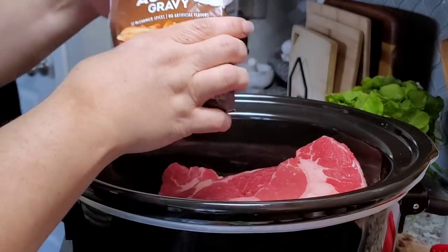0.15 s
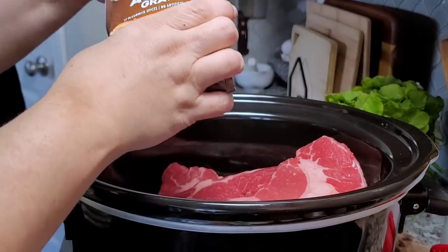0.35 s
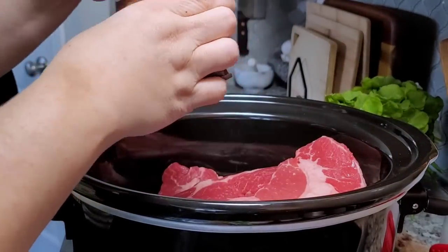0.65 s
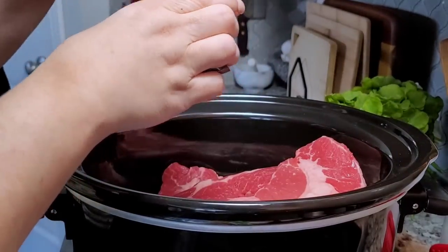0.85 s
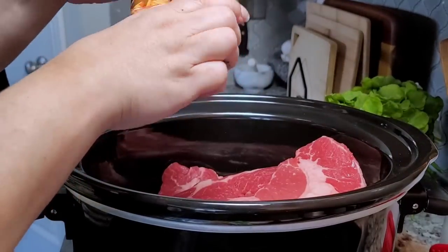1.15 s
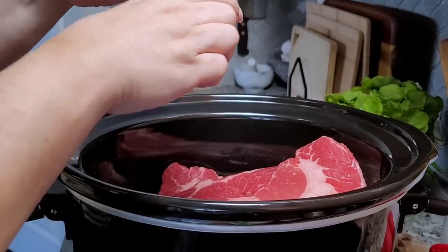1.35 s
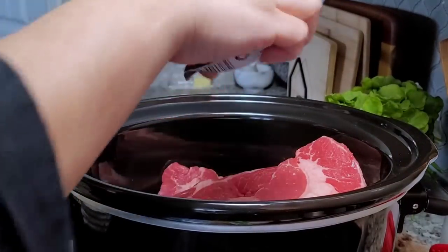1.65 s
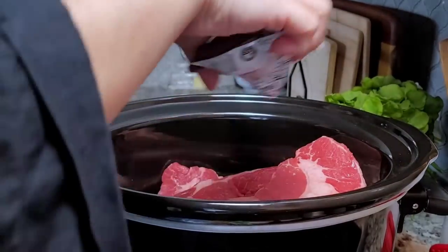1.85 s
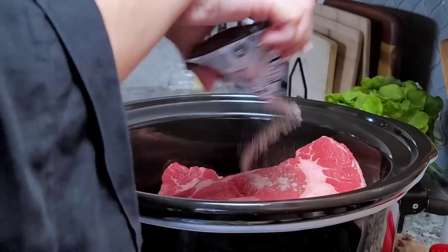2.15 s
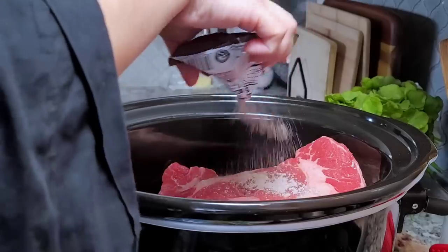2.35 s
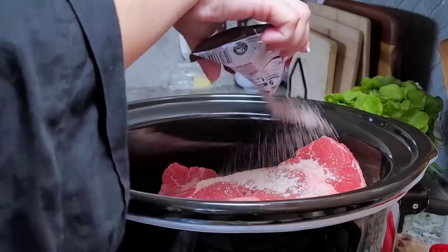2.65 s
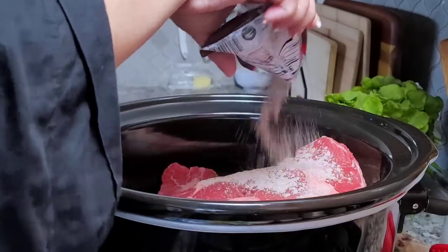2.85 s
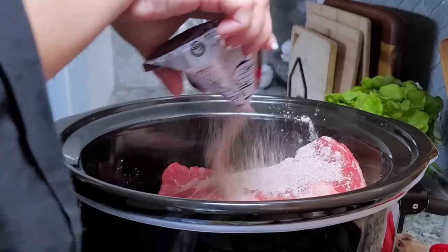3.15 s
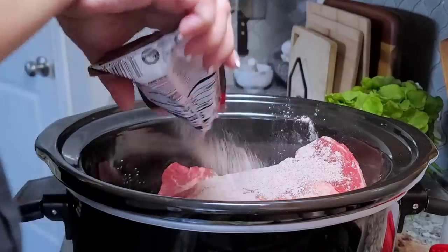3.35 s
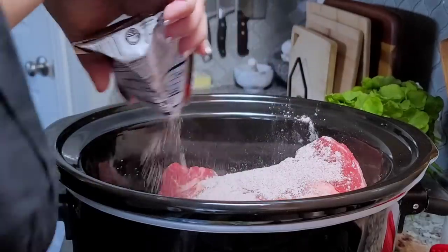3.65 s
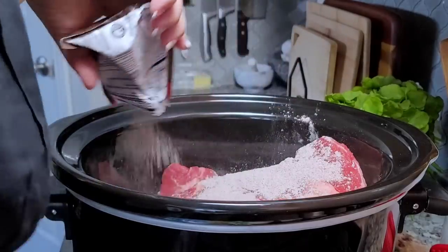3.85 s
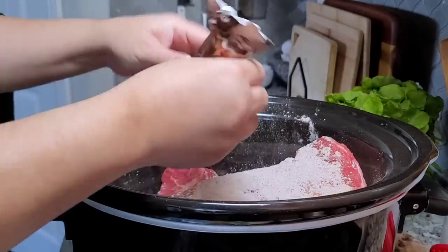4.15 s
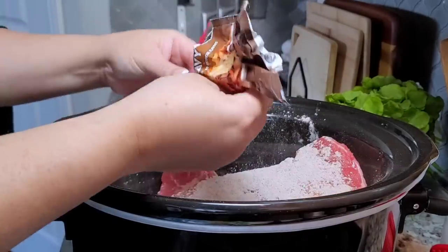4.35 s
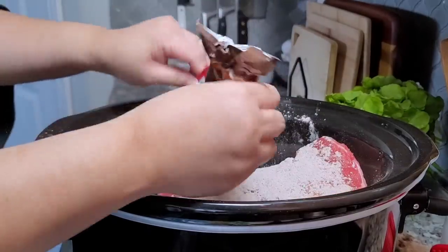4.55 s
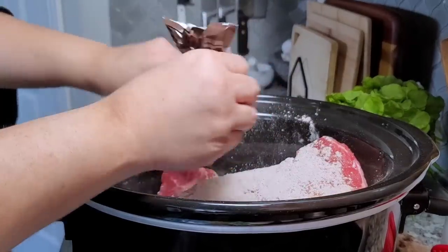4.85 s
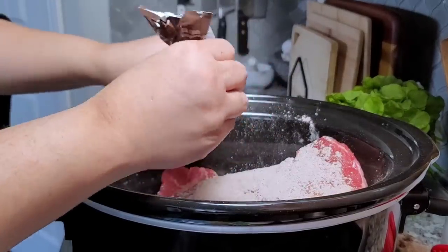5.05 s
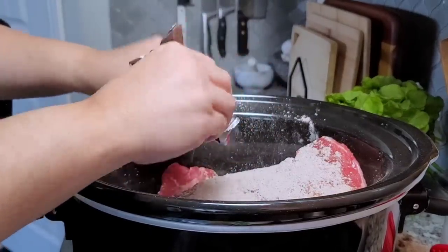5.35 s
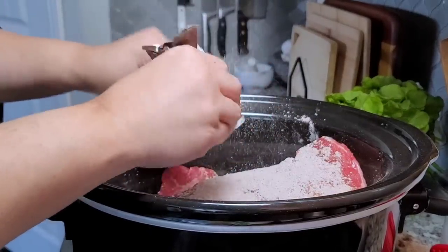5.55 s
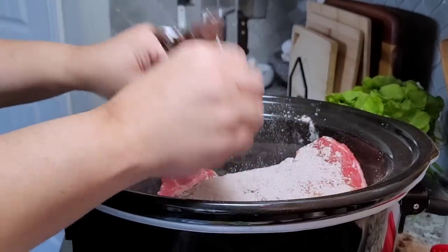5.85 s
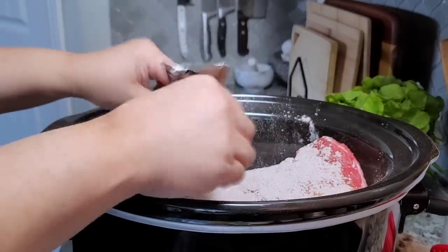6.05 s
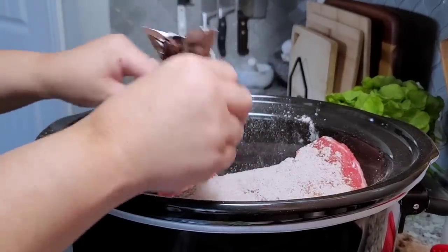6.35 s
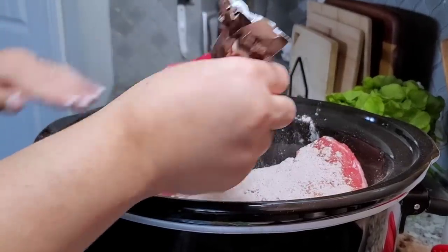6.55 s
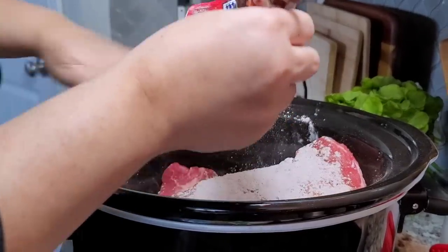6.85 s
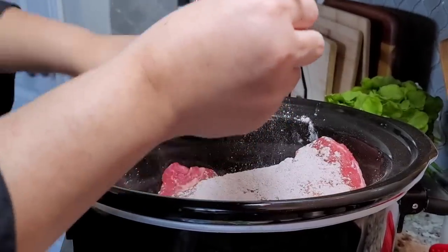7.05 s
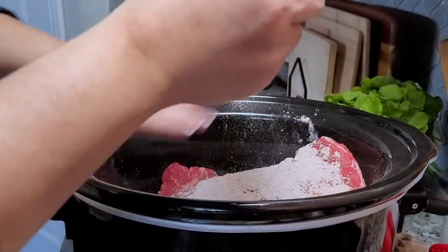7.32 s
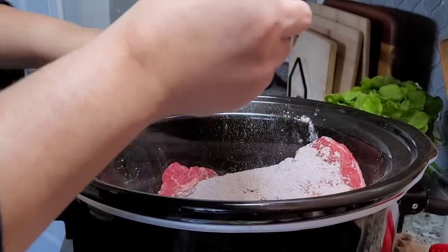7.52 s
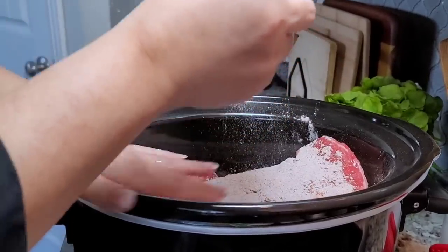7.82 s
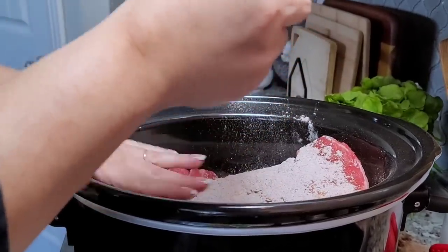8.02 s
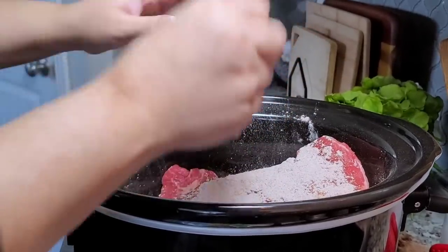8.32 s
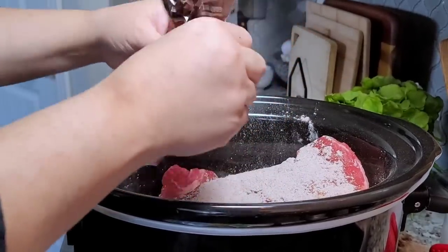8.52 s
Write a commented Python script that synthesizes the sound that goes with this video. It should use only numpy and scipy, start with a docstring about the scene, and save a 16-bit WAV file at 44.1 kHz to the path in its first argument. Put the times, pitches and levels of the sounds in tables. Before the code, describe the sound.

In a small kitchen with a faint appliance hum, hands work a paper packet close to the microphone, giving dry pops and crinkles. Seasoning slides out with a fine, pulsing hiss and lands lightly on meat in a crock. More rustling and snapping follows as the packet is handled. Near the end comes a cluster of low, hollow worktop knocks with two thin metallic clinks.

```python
"""A paper packet of seasoning is opened and shaken out over meat in a crock, in a small kitchen.
Its stiff walls buckle with dry snaps and crackle under the fingers. The powder slides out with a
fine hiss and patters on the meat. Near the end come hollow knocks at the worktop; two of them jolt
a metal utensil, which clinks. An arm sweeps past with a soft rumble, and an appliance hums throughout."""
import sys
import numpy as np
from scipy import signal
from scipy.fft import rfft, irfft, next_fast_len
from scipy.io import wavfile
from scipy.ndimage import map_coordinates

SR = 44100
rng = np.random.default_rng(int(sys.argv[2]) if len(sys.argv) > 2 else 0)


def waveform_to_disk(signal):
    """Save audio, clipped to [-1, 1], as 16-bit WAV at the path in sys.argv[1]."""
    frames = np.transpose(np.atleast_2d(signal))
    scaled = np.clip(frames, -1, 1) * 32767
    samples = np.round(scaled).astype(np.int16)
    wavfile.write(sys.argv[1], SR, samples)


N = 382788
TIME = np.arange(N) / SR
HIT_TIME = TIME[:SR * 7 // 10]  # the clock for one short sound
TREBLE_LIMIT_HZ = 15800


# Packet walls buckling: t/s, air pop f/Hz, level/dB, wall f/Hz, level/dB,
# crease f/Hz, level/dB, fibre crack level/dB
WALL_SNAPS = [(0.045, 780, -55, 1870, -46, 3000, -42, -69), (.27, 600, -53.5, 1070, -48, 2420, -45, -60),
              (0.3181, 425, -40.5, 1490, -49, 3730, -59, -60),
              (.451, 420, -48.5, 1460, -38, 2820, -49, -61.5),
              (0.513, 690, -40, 1380, -32.5, 2840, -41.5, -42.5),
              (0.536, 470, -37.5, 1240, -29, 2750, -39.5, -48.5),
              (.5395, 804, -36.5, 1340, -43, 3900, -45, -44.5),
              (.598, 490, -48.5, 1530, -42, 3140, -52, -53),
              (0.7561, 624, -44.5, 1720, -38, 2800, -40, -53), (1.227, 695, -47, 1900, -46, 2530, -53, -65),
              (1.2467, 430, -41, 1500, -44, 2090, -37, -52),
              (1.252, 840, -44.5, 1370, -37.5, 3360, -46.5, -51.5),
              (1.2566, 650, -36.5, 1440, -44, 2530, -42, -50),
              (1.262, 247, -43.5, 1100, -66, 1950, -49, -64),
              (1.336, 800, -41.5, 1410, -41.5, 2500, -52, -74),
              (1.379, 690, -35, 1210, -34, 1820, -35.5, -65),
              (1.459, 610, -48, 1200, -45.5, 2880, -55, -55.5),
              (1.667, 596, -73, 1460, -53.5, 2690, -67, -64),
              (4.188, 490, -62, 1540, -54.5, 2680, -49, -54), (4.534, 513, -54, 1810, -60, 3650, -66, -58),
              (4.661, 307, -65, 1950, -65, 2820, -52.5, -54),
              (4.788, 765, -58.5, 1990, -76, 2680, -54, -51),
              (4.8143, 800, -63.5, 1280, -47.5, 2860, -55, -55.5),
              (5.05, 610, -52, 1120, -65.5, 3020, -64, -72), (5.3, 600, -54, 1220, -66.5, 2980, -64, -69),
              (5.5199, 774, -40.5, 1440, -44, 3350, -50.5, -48.5),
              (5.571, 866, -41.5, 1470, -33, 3020, -39.5, -49.5),
              (5.579, 440, -42.5, 1400, -41, 3380, -59, -55),
              (5.711, 463, -45, 1580, -45.5, 2970, -52, -55),
              (5.734, 454, -48, 1640, -46.5, 2320, -46.5, -56),
              (6.215, 750, -61.5, 1290, -57, 3120, -55, -61.5),
              (6.388, 670, -56.5, 1270, -52, 2810, -52, -56)]
# Notes of the crock's hollow, woken by snaps and knocks: f/Hz, width/Hz, level/dB
CROCK_HOLLOW = [(430, 16, 6), (792, 67, 5), (926, 16, -1.5), (1273, 53, 1), (1640, 39, -3), (2020, 95, -3),
                (2860, 33, -6.5)]

def packet_snaps(ragged_below_db=-43, crack_top_hz=6600):
    """A wall flips: the air inside pops, wall and crease ring, fibres crack and the crock answers."""
    out = np.zeros((2, N))
    for s, pop_hz, pop_db, wall_hz, wall_db, crease_hz, crease_db, crack_db in WALL_SNAPS:
        # the fingers scatter the sound briefly, the crock for longer
        flip = click(scatter_db=7, t60=.02) + click(scatter_db=3.5, t60=.055)
        split = click(scatter_db=15, t60=.05)
        # a lightly pressed wall gives way in a ragged run of small slips
        if wall_db < ragged_below_db and crack_db > wall_db - 12:
            flip += click(scatter_db=12, t60=.06) * fade_in(.002)
            split *= fade_in(.003)
        fizz = from_db(-14.5) * band(split, crack_top_hz, TREBLE_LIMIT_HZ)
        crack = hit_level(band(split, 3500, crack_top_hz, order=3) + fizz, crack_db)
        pop = hit_level(flex(flip, pop_hz, q=3.3), pop_db - 2.24)
        wall = hit_level(flex(flip, wall_hz, q=3.2), wall_db - 2.1)
        crease = hit_level(flex(flip, crease_hz, q=7.2), crease_db)
        add(out, s, pop + wall + crease + crack)
    return out + from_db(-5) * resonances(out, CROCK_HOLLOW)


def flex(flip, hz, q):
    """Turn a click into a few wobbles at one pitch; a higher q rings longer."""
    return band(resonate(flip, hz, hz / q), .4 * hz, 1.5 * hz, order=3)


# Small creases giving way: t/s, level/dB
CREASE_TICKS = [(.3185, -56), (.683, -58), (1.425, -57.5), (1.554, -71), (3.72, -54.5), (3.748, -56.5),
                (4.662, -59.5), (4.778, -54), (4.789, -52), (5.571, -45), (7.808, -60)]

def crease_ticks():
    """A small crease gives way: a thin, bright tick with no pop of air behind it."""
    out = np.zeros((2, N))
    for s, db in CREASE_TICKS:
        tick = band(click(scatter_db=11, t60=.064), 4500, TREBLE_LIMIT_HZ)
        add(out, s, hit_level(tick, db))
    return out


# Fingers working the packet: start t/s, end t/s, level/dB
FINGER_GRIPS = [(0.18, 0.853, -68.5), (1.14, 1.7, -66), (4.277, 4.415, -69), (4.537, 5.085, -68),
                (5.515, 5.807, -64), (6.228, 6.572, -68.5), (7.804, 8.033, -64.5)]
# Fingers sliding on it: middle t/s, half length/s, level/dB, crumple compared with that level/dB
FINGER_RUBS = [(0.023, 0.035, -46, -3), (0.7, 0.035, -60.5, 9.5), (0.746, 0.0049, -63.5, 20),
               (0.844, 0.019, -50, -3.5), (1.043, 0.011, -53.5, 4.5), (1.097, 0.021, -48, 1),
               (1.162, 0.0098, -65, 17), (4.216, 0.035, -50.5, -3), (4.714, 0.035, -49.5, -8.5),
               (4.81, 0.022, -53, -2), (5.059, 0.027, -61.5, -9), (5.191, 0.017, -54, -11),
               (5.459, 0.0097, -56.5, -5), (5.564, 0.005, -55.5, 6), (5.728, 0.011, -47, 6.5),
               (5.898, 0.027, -60.5, 0.5), (5.968, 0.018, -60.5, 3), (6.075, 0.021, -63, 2.5),
               (6.502, 0.011, -55.5, -22), (6.565, 0.024, -54.5, -7), (6.831, 0.0071, -51, 1),
               (6.89, 0.038, -60, -20), (8.256, 0.035, -61, -41)]
# Tone of the paper's fine crackle and of its lower crumple: f/Hz, level/dB
CRACKLE_TONE = [(2000, -5.5), (4000, 0.5), (6000, -2.5), (9000, -3.5), (13000, -4), (16000, -11.5)]
CRUMPLE_TONE = [(300, 13.5), (700, -2), (1600, 8), (2800, 3), (4200, -9), (7000, -56)]

def paper_rustle(held_db=-75):
    """Fibres catch and slip under the fingers: a light crackle that swells with each grip and rub."""
    grips = sum((from_db(db) * swell(start, end, rise_s=.011, fall_s=.016)) ** 2
                for start, end, db in FINGER_GRIPS)
    crackle_gain = np.sqrt(from_db(held_db) ** 2 + grips)
    crumple_gain = crackle_gain * from_db(2)
    for s, half_length, db, crumple_db in FINGER_RUBS:
        stroke = from_db(db) * np.exp(-.5 * ((TIME - s) / half_length) ** 2)
        crackle_gain = np.hypot(crackle_gain, stroke)
        crumple_gain = np.hypot(crumple_gain, stroke * from_db(crumple_db))
    for s, _, _, _, wall_db, *_ in WALL_SNAPS:  # each snap leaves a short crinkle
        crinkle = from_db(wall_db - 7) * swell(s, s, rise_s=.0022, fall_s=.006)
        crumple_gain = np.hypot(crumple_gain, crinkle)
    crackle = crackle_gain * colour(grains(per_s=2500, spread_db=1.5), CRACKLE_TONE)
    crumple = crumple_gain * colour(grains(per_s=900, spread_db=3.2), CRUMPLE_TONE)
    return lean_right(crackle + crumple, .24)


# The steady stream of powder, and the shakes that each throw an extra puff: t/s, level/dB
POWDER_STREAM = [(1.88, -81), (1.95, -72), (2.16, -68), (2.69, -63), (2.97, -60), (3.54, -60.5),
                 (3.84, -69.5), (4.14, -58.5), (4.33, -84)]
POWDER_PUFFS = [(1.986, -58), (2.114, -58.5), (2.17, -63), (2.33, -65.5), (2.402, -58.5), (2.551, -60.5),
                (2.631, -68), (2.712, -58), (2.845, -53.5), (2.955, -58.5), (3.0, -54.5), (3.095, -51.5),
                (3.16, -57.5), (3.25, -59.5), (3.535, -60), (3.914, -65)]
# Tone of grains sliding and of grains landing: f/Hz, level/dB
HISS_TONE = [(1760, -23), (3000, -10), (3590, -8), (4120, -5), (4440, -6), (9980, -5), (11500, -2.5),
             (15500, -7)]
PATTER_TONE = [(500, -12), (1200, -9), (2000, -5.5), (3000, -5), (4500, -10), (7000, -8.5)]
# Notes of the crock's wall: f/Hz, level/dB, ring time/s
CROCK_NOTES = [(1450, 5, 0.025), (1804, 16, 0.076), (2140, 4, 0.07)]
# Lumps that ping on the crock: t/s, f/Hz, level/dB
POWDER_LUMPS = [(2.118, 1390, -63), (2.408, 1790, -65), (2.564, 2150, -67), (2.6, 1860, -65),
                (2.757, 1817, -63)]

def powder(covered_from_s=3.2, soften_db_per_s=3):
    """Countless grains slide down the paper and patter on the meat; some make the crock ring."""
    puffs = sum((from_db(db) * swell(s, s, rise_s=.018, fall_s=.032)) ** 2 for s, db in POWDER_PUFFS)
    flow = np.sqrt(gain_curve(POWDER_STREAM) ** 2 + puffs)
    landing = colour(grains(per_s=1400, spread_db=3), PATTER_TONE)
    peaks = [(hz, np.log(1000) / (np.pi * t60), db) for hz, db, t60 in CROCK_NOTES]  # time to width
    crock = rms_one(resonances(landing, peaks))
    hiss = flow * from_db(2.5) * colour(grains(per_s=2000, spread_db=4.4), HISS_TONE)
    patter = flow * (from_db(.9) * landing + from_db(-13) * crock)
    # a growing bed of powder softens the patter
    patter *= from_db(-soften_db_per_s * np.maximum(TIME - covered_from_s, 0))
    pings = np.zeros((2, N))
    for s, hz, db in POWDER_LUMPS:
        add(pings, s, hit_level(ring([(hz, 0, .055)], vary_db=0), db + 6))
    return lean_right(hiss + patter + pings, .76)


# Echoes off the crock's wall and floor: delay/s, level/dB
CROCK_ECHOES = [(.0009, -20.5), (.0021, -4.5)]

def crock_echoes(x, sway_share=.26, sway_every_s=.4):
    """The glazed crock throws the sound back, with delays that wander as the hands move."""
    out = x.copy()
    turns = np.arange(0, TIME[-1] + 1, sway_every_s)
    for delay_s, db in CROCK_ECHOES:
        for ear in range(2):
            sway = np.interp(TIME, turns, rng.uniform(-1.023, 1, len(turns)))
            delay = delay_s * (1 + sway_share * sway)
            out[ear] += from_db(db) * map_coordinates(x[ear], [(TIME - delay) * SR], order=3)
    return out / np.sqrt(1 + sum(from_db(db) ** 2 for _, db in CROCK_ECHOES))


# Blows at the worktop: t/s, boom level/dB, body level/dB, clack level/dB, top of the clack f/Hz
WORKTOP_BLOWS = [(6.788, -44.5, -42, -34.5, 7900), (6.887, -42.5, -46, -53, 486),
                 (6.924, -41.5, -56, -78, 900), (7.11, -41, -35.5, -26, 7000),
                 (7.326, -40, -36, -38.5, 2800), (7.362, -37, -36.5, -39.5, 880),
                 (7.535, -54, -38, -38.5, 3530), (7.55, -43, -35, -35.5, 2370),
                 (7.563, -44, -36, -39.5, 2000), (7.813, -45.5, -34, -34.5, 4400),
                 (8.199, -56, -51, -66, 1190)]
# Tone of the hard clack and of the dull thud: f/Hz, level/dB
CLACK_TONE = [(200, 2.5), (350, -3), (480, -4), (650, 7), (1000, -5.5), (1400, 6), (2000, -3), (3200, -10),
              (4500, -17.5), (8000, -27.5), (14000, -60)]
THUD_TONE = [(140, -1), (220, -5), (400, -3), (700, -10.5), (3000, -55)]
# Notes of the worktop and of the cabinet below: f/Hz, level/dB, ring time/s
WORKTOP_NOTES = [(204.6, 6, 0.11), (230, 10, 0.077), (268, -6.5, 0.28), (409, -4.5, 0.17), (580, 3, 0.085),
                 (618, 1, 0.14), (644, 1, 0.1), (721, -3, 0.23), (830, -7.5, 0.11), (944, -1, 0.067),
                 (1165, -6.5, 0.12), (1410, -21, 0.13), (1980, -24, 0.11), (2370, -25, .13),
                 (2905, -26, .14)]
CABINET_NOTES = [(69.6, 1, 0.4), (81.6, 1.5, 0.25), (138, -21, 0.47)]

def worktop_knocks():
    """Each blow clacks and thuds, sets crock and worktop ringing and makes the cabinet boom."""
    out = np.zeros((2, N))
    for s, boom_db, body_db, clack_db, top_hz in WORKTOP_BLOWS:
        clack = colour(noise(len(HIT_TIME)), CLACK_TONE) * fade_in(.0006) * die_away(.11)
        clack = band(clack, 148, top_hz)
        clack += from_db(-2) * resonances(clack, CROCK_HOLLOW)
        thud = colour(noise(len(HIT_TIME)), THUD_TONE) * fade_in(.0087) * die_away(.13)
        body = hit_level(ring(WORKTOP_NOTES, vary_db=1), body_db - 1)
        boom = hit_level(ring(CABINET_NOTES, vary_db=1.5), boom_db - 2)
        add(out, s, hit_level(clack, clack_db) + hit_level(thud, body_db - 8))
        add(out, s + .00241, body)
        add(out, s + .0046, lean_right(boom, 2))
    return out


# A metal utensil jolted by the knocks: t/s, clank level/dB, tick level/dB, ring level/dB
UTENSIL_JOLTS = [(7.3545, -47, -31.5, -55.5), (7.572, -43.5, -52, -56.5)]
# Its short clank: f/Hz, width/Hz, level/dB
UTENSIL_CLANK = [(2900, 70, -9), (3290, 190, -2.5), (3860, 150, 3)]
# Its ringing notes: f/Hz, level/dB, ring time/s
UTENSIL_NOTES = [(2762, -8, .22), (3250, -1, .65), (3897, -4, .6), (3985, -2, .6), (4902, -1, .5),
                 (5030, -4, .55), (6045, -13, .45)]

def utensil_clinks():
    """Jolted metal gives a bright tick, a short clank and a thin ring."""
    out = np.zeros((2, N))
    for s, clank_db, tick_db, ring_db in UTENSIL_JOLTS:
        contact = click(scatter_db=24, t60=.1)
        tick = hit_level(band(contact, 2800, 15300), tick_db - 5)
        clank = hit_level(resonances(contact, UTENSIL_CLANK), clank_db + 6.5)
        ringing = hit_level(ring(UTENSIL_NOTES, vary_db=1.5), ring_db - 1.5)
        add(out, s, tick + clank + ringing)
    return lean_right(out, .97)


# The arm sweeping past: t/s, level/dB
ARM_SWEEP = [(1.2, -59), (1.35, -61), (1.8, -62.5), (2.0, -76)]
# Tone of its rumble: f/Hz, level/dB
RUMBLE_TONE = [(25, -23), (45, 0), (70, -15), (200, -21), (600, -32), (2000, -90)]

def arm_rumble():
    """Air stirred by the arm rumbles on the microphone."""
    return gain_curve(ARM_SWEEP) * colour(noise(N), RUMBLE_TONE)


# How long the kitchen rings: f/Hz, ring time/s
KITCHEN_RING_TIMES = [(100, 0.46), (500, 0.61), (1600, 0.48), (4000, 0.49), (14000, 0.39)]

def kitchen_echo(x, echo_db):
    """The room adds a wash of echoes, in which each band of pitches dies at its own pace."""
    white, tail = rng.standard_normal((2, 2, len(HIT_TIME))), 0
    edges_hz = np.geomspace(22, 17000, 25)
    for k, (low, high) in enumerate(zip(edges_hz, edges_hz[1:])):
        hz = np.sqrt(low * high)
        mid, side = band(white[k % 2], low, high) * die_away(at_hz(KITCHEN_RING_TIMES, hz))
        tail = tail + two_ears(mid, side, hz)
    tail *= fade_in(.0002)
    tail /= np.sqrt(np.sum(tail[0] ** 2))
    return x + from_db(echo_db) * signal.fftconvolve(x, tail, axes=1)[:, :N]


def appliance_hum(hz=91.8, db=-61.5):
    """An appliance hums on one low note; noise near that pitch makes it waver."""
    flutter = resonate(rng.standard_normal(N + SR), hz, width_hz=8.4)
    flutter = rms_one(resonate(flutter, hz, width_hz=22.4)[SR:])
    hum = rms_one(np.sqrt(2) * np.sin(2 * np.pi * hz * TIME) + .5 * flutter)
    return lean_right(from_db(db) * hum, 1.5)


# Tone of the room's air: f/Hz, level/dB
AIR_TONE = [(15, -45), (25, -5), (43, -10), (71, -9), (96, -3.5), (221, -12.5), (340, -11), (582, -10.5),
            (1020, -23.5), (1380, -20.5), (2060, -33), (4750, -34.5), (8580, -44.5), (13200, -38),
            (15500, -44)]

def room_air(db=-60.5):
    """The air in the room makes a faint, steady rush."""
    return lean_right(from_db(db) * colour(noise(N), AIR_TONE), .6)


# How alike a room's sound is at the two ears: f/Hz, likeness (1 = the same, 0 = unrelated)
EAR_LIKENESS = [(50, 1), (140, 0.67), (260, 0.32), (500, -0.3), (1500, -0.17), (12000, 0.06)]

def two_ears(mid, side, hz):
    """Mix a shared part and a differing part into left and right; low notes reach both ears alike."""
    alike = at_hz(EAR_LIKENESS, hz)
    return np.sqrt(1 + alike) * mid + np.sqrt(1 - alike) * side * [[1], [-1]]


def colour(x, tone):
    """Give two unrelated noises a tone and spread them between the ears, at average strength 1."""
    size = next_fast_len(x.shape[1])
    hz = np.maximum(np.fft.rfftfreq(size, 1 / SR), 1)
    bass_cut = np.minimum(hz / tone[0][0], 1) ** 2
    mid, side = rfft(x, size) * from_db(at_hz(tone, hz)) * bass_cut
    return rms_one(irfft(two_ears(mid, side, hz), size)[:, :x.shape[1]])


def ring(notes, vary_db):
    """A struck object's notes, varied per blow; high ones reach the two ears out of step."""
    out = 0
    for hz, db, t60 in notes:
        apart = np.arccos(at_hz(EAR_LIKENESS, hz)) * rng.choice([-1, 1]) * np.array([[.5], [-.5]])
        strength = from_db(db + vary_db * rng.standard_normal()) * rng.choice([-1, 1])
        wave = np.sin(2 * np.pi * hz * HIT_TIME + apart)
        out = out + strength * wave * fade_in(.5 / hz) ** 2 * die_away(t60)
    return out


def grains(per_s, spread_db):
    """Tiny clicks of uneven size at random moments, each smeared by nearby surfaces."""
    sizes = from_db(spread_db * np.minimum(rng.exponential(1, N), 4))
    sizes *= rng.random(N) < per_s / SR
    smear = noise(SR // 100) * np.exp(-np.linspace(0, 5, SR // 100))
    energy = signal.fftconvolve(sizes[None] ** 2, smear ** 2)[:, :N]
    return np.sqrt(np.abs(energy)) * noise(N)


def click(scatter_db, t60, lead_s=.0001):
    """A click that reaches the left ear first, with its scatter off hands, crock and worktop."""
    out = noise(len(HIT_TIME)) * die_away(t60) + 1e-18
    out *= from_db(scatter_db) / np.sqrt(np.sum(out[0] ** 2))
    out[0, 0] += 1
    out[1, round(lead_s * SR)] += 1
    return out


def noise(samples):
    """A different plain hiss for each ear."""
    return rng.standard_normal((2, samples))


def band(x, low_hz, high_hz, order=2):
    """Keep the pitches between two limits."""
    return signal.sosfilt(signal.butter(order, [low_hz, high_hz], "band", fs=SR, output="sos"), x)


def resonate(x, hz, width_hz):
    """Let a sound ring at one pitch; a narrower width rings longer."""
    r = np.exp(-np.pi * width_hz / SR)
    feedback = [1, -2 * r * np.cos(2 * np.pi * hz / SR), r * r]
    return signal.lfilter(np.array([1, 0, -1]) * (1 - r * r) / 2, feedback, x)


def resonances(x, peaks):
    """Let a sound ring at several pitches at once."""
    return sum(from_db(db) * resonate(x, hz, width_hz) for hz, width_hz, db in peaks)


def fade_in(rise_s):
    """Soften the start of a hit."""
    return 1 - np.exp(-HIT_TIME / rise_s)


def die_away(t60):
    """Fade a hit by 60 dB over its ring time, t60 seconds."""
    return from_db(-60 * HIT_TIME / t60)


def swell(start, end, rise_s, fall_s):
    """Rise smoothly up to start, hold until end, then die away."""
    return np.exp(-.5 * (np.maximum(start - TIME, 0) / rise_s) ** 2 - np.maximum(TIME - end, 0) / fall_s)


def gain_curve(points):
    """Join (time, level) points into a volume curve that fades out beyond its ends."""
    s, db = np.transpose(points)
    fade = np.interp(TIME, [s[0] - .03, s[0], s[-1], s[-1] + .03], [0, 1, 1, 0])
    return fade * from_db(np.interp(TIME, s, db))


def at_hz(points, hz):
    """Read between a table's rows, with octaves evenly spaced."""
    freqs, values = np.transpose(points)
    return np.interp(np.log(hz), np.log(freqs), values)


def from_db(db):
    """Turn decibels into a number to multiply by."""
    return 10 ** (np.asarray(db) / 20)


def rms_one(x):
    """Scale a sound to an average strength (rms) of 1."""
    return x / np.sqrt(np.mean(x ** 2) + 1e-20)


def hit_level(x, db):
    """Scale a hit so that its first 20 ms have this level."""
    return from_db(db) * x / np.sqrt(np.mean(x[..., :SR // 50] ** 2) + 1e-20)


def lean_right(x, db):
    """Turn the left ear down and the right ear up, each by db."""
    return x * from_db([[-db], [db]])


def add(out, s, sound):
    """Mix a sound in at time s."""
    start = round(s * SR)
    out[:, start:start + sound.shape[-1]] += sound[..., :N - start]


def scene():
    """Packet and knocks echo in the kitchen, over the rumble, the hum and the room's air."""
    packet = packet_snaps() + crease_ticks() + crock_echoes(paper_rustle() + powder())
    packet = kitchen_echo(packet, echo_db=-10)
    worktop = kitchen_echo(worktop_knocks() + utensil_clinks(), echo_db=-11.5)
    return packet + worktop + arm_rumble() + appliance_hum() + room_air()


def record(dry):
    """The microphone loses the deepest bass; the very top of the treble is cut."""
    lean = signal.sosfilt(signal.butter(2, 30, "high", fs=SR, output="sos"), dry)
    return signal.sosfilt(signal.ellip(10, .1, 70, TREBLE_LIMIT_HZ, fs=SR, output="sos"), lean)


dry = scene()
out = record(dry)
waveform_to_disk(out)
```